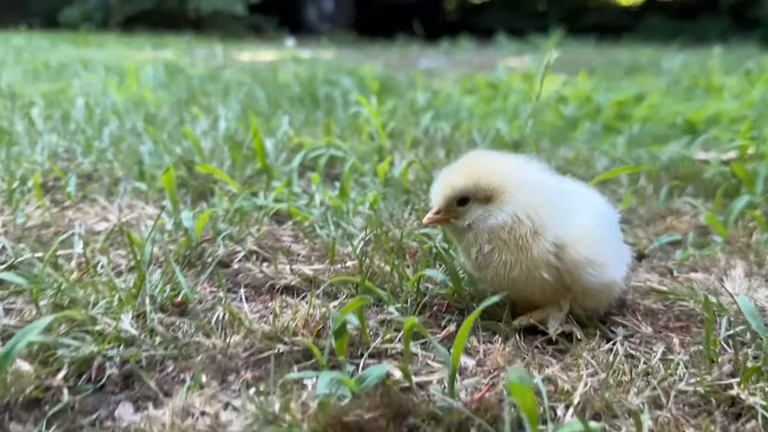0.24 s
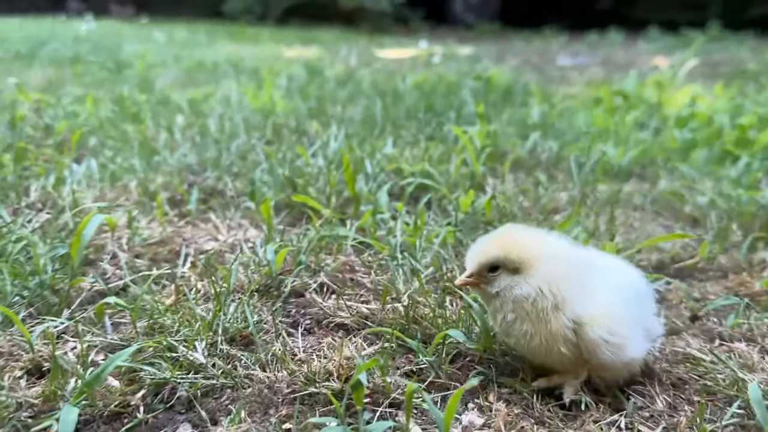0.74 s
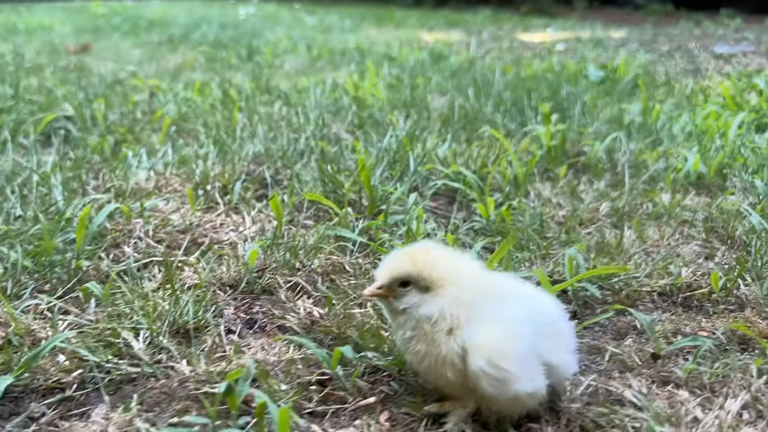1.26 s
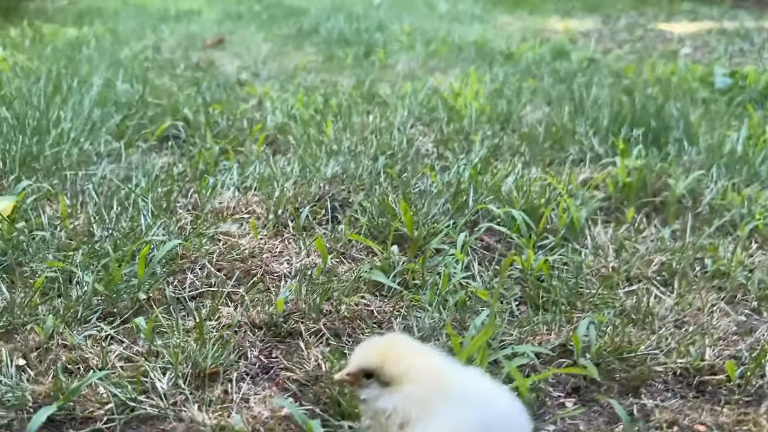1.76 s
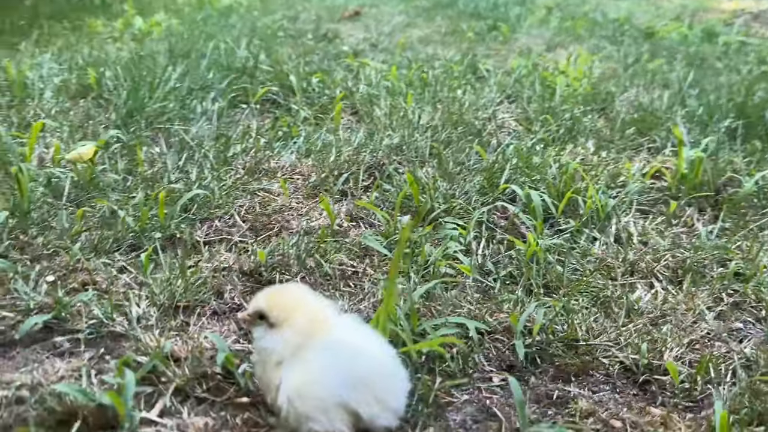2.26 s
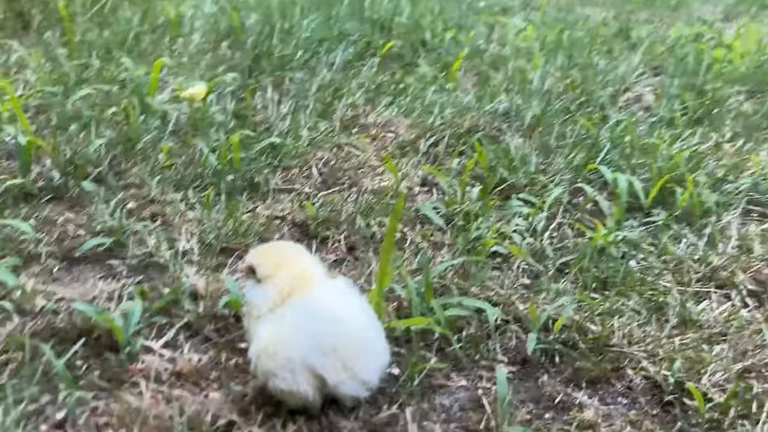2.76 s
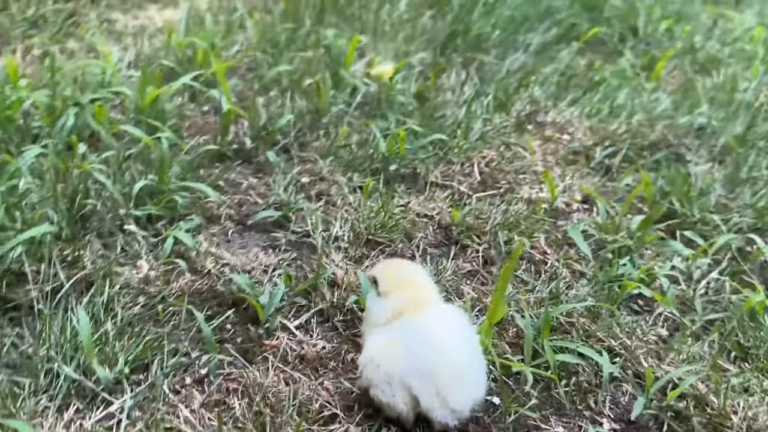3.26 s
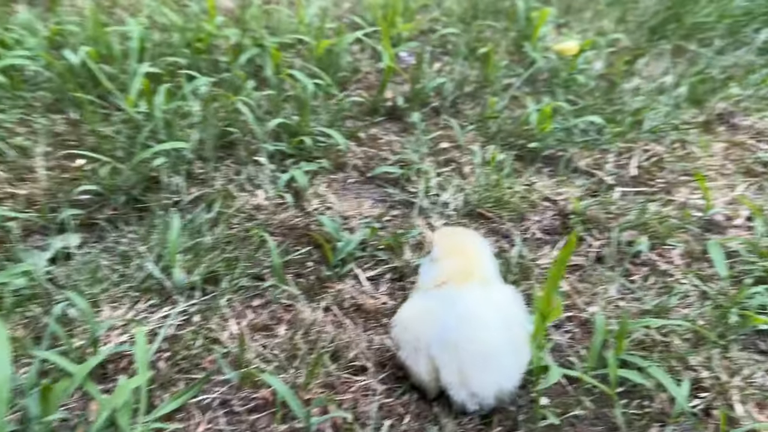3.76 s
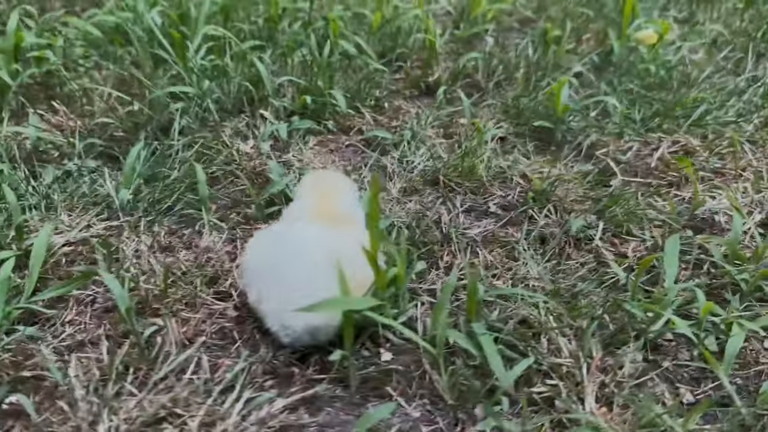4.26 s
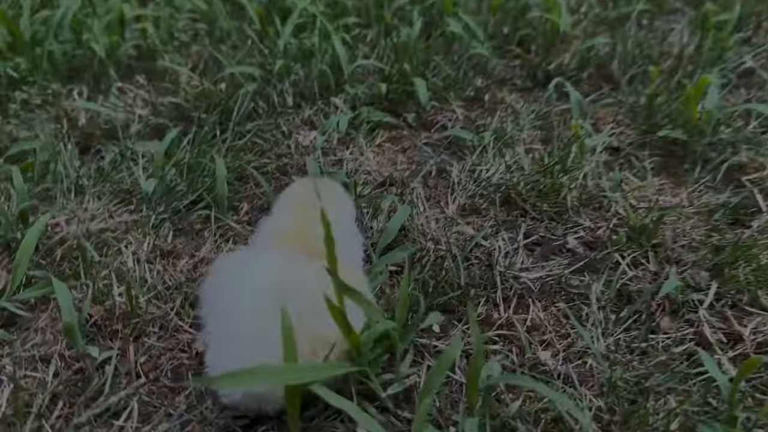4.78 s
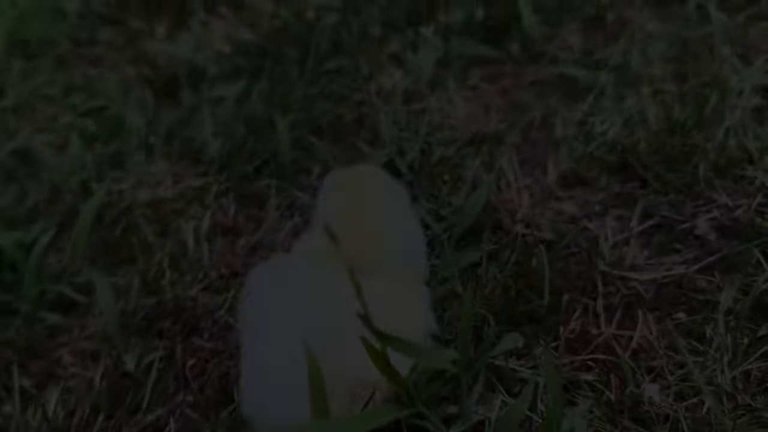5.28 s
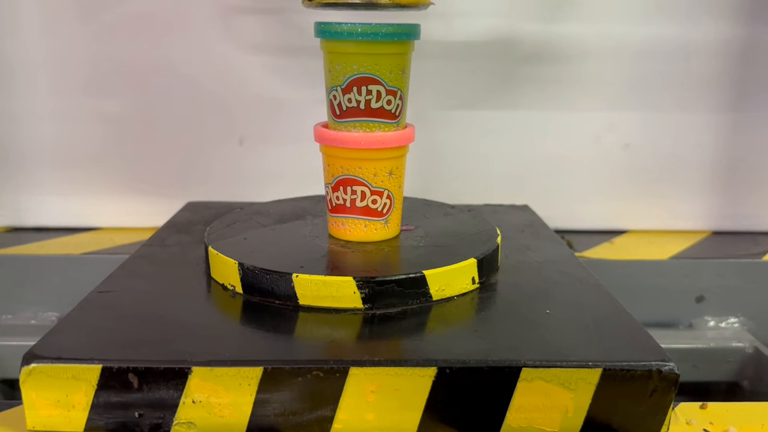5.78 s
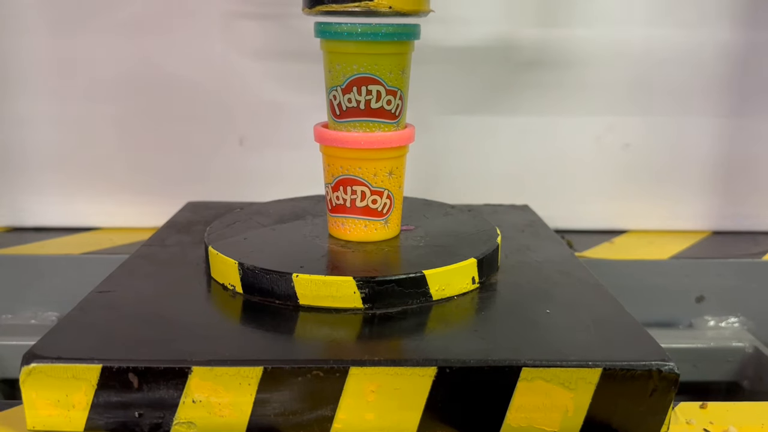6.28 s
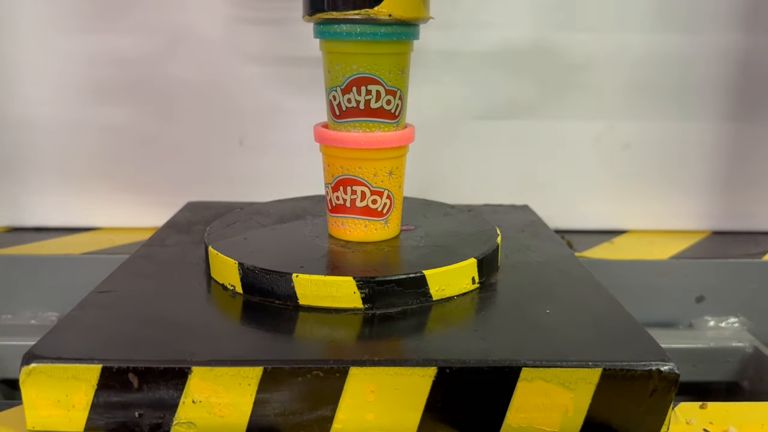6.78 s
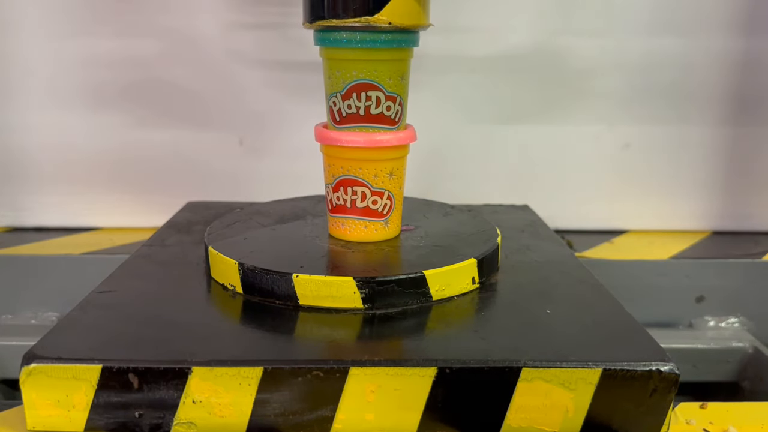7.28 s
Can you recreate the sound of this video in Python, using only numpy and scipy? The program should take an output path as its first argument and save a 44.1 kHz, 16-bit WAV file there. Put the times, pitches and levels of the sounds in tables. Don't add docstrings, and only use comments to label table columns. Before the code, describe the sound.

From 0 to 5.7 s, a quiet lawn: deep distant traffic rumble, airy grass noise and faint falling bird calls scattered behind. A chick gives brief, clear, arching peeps at about 0.3, 0.45, 0.8, 1.0, 1.3, 1.55, 1.9 and 2.2 s, then no more. Around 1.7-2.1 s close scuffs and dull knocks stir the grass; between 2.4 and 3.3 s rustling thickens with brittle stalk snaps and swishes. Small distant whistles appear near 3.5 and 4.2 s. More knocks and sharp crackles come around 4.8-5.3 s, with soft low thumps near 5.6 s. At 5.7 s it cuts abruptly to a far louder hydraulic press: a buzzing pump hum around 245 Hz, rapid metallic chatter, whining overtones, oil hiss and high whistle. It builds within half a second, rises very slightly in pitch, shifts subtly in timbre near 7 s and runs through 7.5 s.

```python
import sys
import numpy as np
from scipy import signal
from scipy.io import wavfile

SR = 44100
rng = np.random.default_rng(int(sys.argv[2]) if len(sys.argv) > 2 else 0)


def elevation(decibels):
    levels = np.asarray(decibels, float)
    return 10 ** (levels / 20)


def bounce(signal):
    frames = np.transpose(np.atleast_2d(signal))
    limited = np.clip(frames, -1, 1)
    pcm = np.round(limited * 32767).astype(np.int16)
    wavfile.write(sys.argv[1], SR, pcm)


N = 332514
TIME = np.arange(N) / SR
CUT_S = 5.7128
SINCE_CUT = np.maximum(TIME - CUT_S, 0)


def rms_one(x):
    return x / np.sqrt(np.mean(x ** 2) + 1e-20)


def in_time(rows):
    return np.interp(TIME, *np.transpose(rows))


def at_hz(points, hz):
    f, value = np.transpose(points)
    return np.interp(np.log(hz), np.log(f), value)


def pan(x, db):
    return np.array([x * elevation(db / 2), x * elevation(-db / 2)])


def add(out, s, sound):
    i = round(s * SR)
    out[:, i:i + sound.shape[-1]] += sound


def drift(rate):
    step = 40
    r = np.exp(-2 * np.pi * rate * step / SR)
    slow = signal.lfilter([1], [1, -2 * r, r * r], rng.standard_normal(N // step + 2002))[2000:]
    return np.interp(np.arange(N) / step, np.arange(len(slow)), rms_one(slow))


def ring(clicks, hz, t60):
    r, w = elevation(-60 / (t60 * SR)), 2 * np.pi * hz / SR
    return signal.lfilter([0, np.sin(w)], [1, -2 * r * np.cos(w), r * r], clicks + 1e-18)


def blurred(hz, blur_hz):
    r = np.exp(-np.pi * blur_hz / SR)
    clear = blur_hz < 30
    draw = rng.standard_normal((2, 2, len(hz) + 4096))
    if clear:
        draw = draw[:, [0, 0]]
    wobble = signal.lfilter([1], [1, -2 * r, r * r], draw[0] + 1j * draw[1])[:, 4096:]
    if clear:
        wobble = wobble + 2 * np.abs(wobble).mean()
    carrier = np.exp(2j * np.pi * np.cumsum(hz) / SR)
    return rms_one(np.real(wobble * carrier))


def smeared(notes):
    out = np.zeros((2, N))
    for s, length, start_hz, end_hz, blur_hz, db in notes:
        u = TIME[:round(2 * length * SR)] / length
        swell = np.minimum(u / .1, 1) * np.exp(-(u / .95) ** 3)
        glide_hz = start_hz + (end_hz - start_hz) * np.minimum(u, 1)
        add(out, s, elevation(db) * swell * blurred(glide_hz, blur_hz))
    return out


def banded_noise(spectrum, alike, swell_db, patchy_db, grain):
    out, edges = 0, 20 * 2 ** np.arange(0, 9.9, .5)
    white = rng.standard_normal((2, 2, N)) * grain
    for k, (low, high) in enumerate(zip(edges, edges[1:])):
        band = signal.butter(2, [low, high], "band", fs=SR, output="sos")
        mid, side = signal.sosfilt(band, white[k % 2])
        hz = np.sqrt(low * high)
        same = np.clip(at_hz(alike, hz), -1, 1)
        gain = elevation(at_hz(spectrum, hz) + swell_db(hz) + patchy_db * drift(4.9))
        out = out + gain * (np.sqrt(1 + same) * mid + np.sqrt(1 - same) * side * [[1], [-1]])
    return out


# f/Hz, bandwidth/Hz, first level/dB, level at the scene change/dB
DRONES = [
    (61.7, 13.5, -55.5, -53),
    (121.8, 3.9, -73.5, -56),
    (11860, 140, -84.5, -110),
]


def drones():
    out = 0
    for hz, blur_hz, first_db, last_db in DRONES:
        level_db = first_db + (last_db - first_db) * TIME / CUT_S
        out = out + elevation(level_db) * blurred(np.full(N, hz), blur_hz)[0]
    return out


# f/Hz, density level/dB per Hz
LAWN_COLOUR = [(12, -44), (20, -32), (46, -2.5), (64, -6.5), (96, -6.5), (127, -9), (208, -18), (306, -19),
               (593, -23), (1060, -23.5), (1940, -20.5), (2110, -23), (2490, -27), (4080, -25.5),
               (14500, -39)]
# f/Hz, likeness
LAWN_ALIKE = [(60, 0.82), (180, 0.847), (540, 0.5), (1600, 0.31), (4790, 0.27), (14300, 0.28)]
# t/s, level/dB
STIR = [(0, -6), (.44, -11), (1.0, -7), (1.55, -5.5), (2.3, -4.5), (2.9, 2), (3.6, 1.5), (4.05, -3.5),
        (4.5, -2), (4.9, 1), (5.3, -2.5), (5.5, -3), (5.72, -8.5)]
# f/Hz, share of the swing
STIR_SHARE = [(200, 0.029), (500, 0.28), (1100, 0.96), (6500, 0.87), (12000, 1.94)]
# t/s, length/s, level over the usual rustle/dB, centre f/Hz
RUSTLES = [(0.26, 0.043, -4, 8000), (1.02, 0.027, -6, 10000), (1.177, 0.053, 1, 8100),
           (1.57, 0.05, 4, 7900), (1.708, 0.16, 10, 1190), (1.702, 0.17, 8, 4340), (1.782, 0.17, 10.5, 890),
           (1.801, 0.2, 10, 5200), (2.102, 0.11, 5, 9050), (2.122, 0.058, 4.5, 1360),
           (2.39, 0.4, 0.5, 10000), (2.74, 0.13, 10, 7350), (2.787, 0.12, 7, 1100), (2.92, 0.26, 10.5, 983),
           (3.2, 0.19, 7.5, 910), (3.297, 0.022, 10.5, 8870), (3.54, 0.12, 7.5, 11000),
           (3.656, 0.034, 13, 11000), (3.83, 0.03, 9, 7600), (4.254, 0.081, 13, 11000),
           (4.268, 0.077, 6, 1200), (4.824, 0.036, -3, 1600), (4.925, 0.022, 11, 10000),
           (5.298, 0.024, 7, 280), (1.796, 0.088, 11.5, 298), (4.418, 0.46, 4.5, 12700),
           (2.953, 0.43, 5, 6200), (0.554, 0.25, -5, 1820), (3.893, 0.414, -1.5, 1200)]


def lawn():
    attack_s, release_s, reach_octaves = 0.028, 0.045, 1
    coarse = TIME[::64]
    s, length, db, centre_hz = np.transpose(RUSTLES)[..., None]
    rise = np.clip((coarse - s) / attack_s, 0, 1) ** 2
    decay = np.exp(-2 * np.maximum(coarse - s - length, 0) / release_s)
    rustle_power = elevation(2 * db) * rise * decay
    stir_db = np.interp(coarse, *np.transpose(STIR))

    def swell_db(hz):
        reach = np.exp(-2 * (np.log2(hz / centre_hz[:, 0]) / reach_octaves) ** 2)
        power = elevation(2 * at_hz(STIR_SHARE, hz) * stir_db) + reach @ rustle_power
        return np.interp(TIME, coarse, 10 * np.log10(power))

    grain = elevation(1.25 * drift(67))
    left, right = banded_noise(LAWN_COLOUR, LAWN_ALIKE, swell_db, patchy_db=1.42, grain=grain)
    return elevation(-29.5) * np.array([left, np.roll(right, 10)])


# t/s, f/Hz, level/dB
FAR_BIRDS = [(.0, 4220, -64), (.09, 5280, -63), (0.599, 3920, -55), (1.223, 4000, -55.5), (2.31, 3830, -55),
             (3.441, 3920, -56), (3.678, 4080, -57), (3.964, 4020, -57.5), (4.286, 4030, -60),
             (4.965, 4160, -61.5), (5.145, 4090, -58.5), (5.457, 4160, -62.5)]
# delay/s, length/s, first share of f, last share of f, bandwidth share of f, level/dB
CALL = [
    (.001, .07, 1.13, 1.11, .025, -1),
    (.014, .065, 1.02, .92, .08, -1),
    (.046, .06, .81, .8, .08, -2.5),
    (.062, .09, .89, .84, .09, -4),
]
# t/s, length/s, first f/Hz, last f/Hz, level/dB
WHISTLES = [(.624, .25, 2400, 2450, -68), (.905, .06, 3350, 3200, -65), (3.457, .022, 2650, 3390, -52),
            (3.492, .02, 2920, 3530, -54), (3.552, .095, 2170, 2165, -54.5), (3.9, .15, 1820, 1840, -65),
            (4.125, .05, 1980, 2070, -63), (4.165, .055, 2070, 2190, -58), (4.212, .07, 2200, 2770, -60)]


def far_birds():
    notes = []
    for s, hz, db in FAR_BIRDS:
        for delay, length, first, last, blur, note_db in CALL:
            level_db = db + note_db + rng.normal(0, 1.5)
            notes.append((s + delay, length, first * hz, last * hz, blur * hz, level_db))
    for s, length, start_hz, end_hz, db in WHISTLES:
        blur_hz = 5 * 2 ** ((-50 - db) / 3.5)
        notes.append((s, length, start_hz, end_hz, blur_hz, db))
    echoes = [(s + 0.026, 1.5 * length, start_hz, .96 * end_hz, 4.1 * blur_hz, db - 13.0)
              for s, length, start_hz, end_hz, blur_hz, db in notes]
    return smeared(notes) + smeared(echoes)


# t/s, peak level/dB, f/Hz
THUMPS = [(1.339, -43, 70.6), (3.337, -37, 84), (5.614, -35, 84), (5.681, -41, 90)]


def thumps():
    out = np.zeros((2, N))
    t = TIME[:4096]
    for s, db, hz in THUMPS:
        cycles_done = np.minimum(t * hz / 2.26, 1)
        add(out, s, elevation(db) * np.sin(2 * np.pi * hz * t) * np.sin(np.pi * cycles_done) ** 2)
    return out


# t/s, peak level/dB, f/Hz
KNOCKS = [(1.708, -45, 1640), (1.785, -43, 1090), (1.808, -31, 1850), (1.848, -37.5, 1110), (2, -37, 1660),
          (2.942, -45.5, 1190), (2.968, -37.5, 1190), (3.247, -41.5, 217), (3.405, -42.5, 1420),
          (3.601, -46, 1350), (3.872, -45, 1190), (4.525, -48.5, 1050), (4.83, -40.5, 1060),
          (4.838, -44, 1540), (4.853, -42.5, 1400), (4.865, -46, 990), (4.96, -45, 1130),
          (5.326, -44.5, 263)]


def knocks():
    out, click = np.zeros((2, N)), np.arange(2048) == 0
    for s, db, hz in KNOCKS:
        rub = rng.standard_normal((2, 2048)) * elevation(-60 * TIME[:2048] / 0.015)
        body = ring(click + 0.38 * rub, hz, 16 / hz)
        upper = 0.59 * ring(rub, 1.38 * hz, 2.8 / hz)
        add(out, s, elevation(db - 6.0) * (body + upper))
    return out


# t/s, length/s, first f/Hz, last f/Hz, level/dB
SWISHES = [(1.718, 0.058, 1700, 1815, -48.5), (1.795, 0.13, 1856, 1700, -48),
           (2.006, 0.052, 1720, 1540, -52.5), (2.76, 0.17, 5200, 4970, -50),
           (2.759, 0.15, 7430, 7250, -48.5), (2.933, 0.083, 1222, 896, -58),
           (3.038, 0.051, 1187, 1184, -48), (3.133, 0.045, 1233, 664, -44)]


def swishes():
    return smeared([(s, length, start_hz, end_hz, 0.22 * start_hz, db)
                    for s, length, start_hz, end_hz, db in SWISHES])


# t/s, peak level/dB, f/Hz, left-right level/dB
SNAPS = [(1.724, -58, 5000, -1), (2.4438, -50, 7600, 14), (2.487, -48, 6900, 20), (2.5713, -47, 6610, 4.5),
         (2.717, -45, 4370, 2.5), (2.745, -43, 4730, 1.5), (2.7604, -38, 5140, 3.0),
         (2.781, -41, 6500, 4.0), (2.795, -48, 5200, 4.0), (2.853, -35, 6500, 6), (2.889, -39, 5000, 4.0),
         (2.8145, -34, 6000, 5.5), (4.6798, -45, 11400, 1.0), (4.8816, -43.5, 6550, 20),
         (4.9445, -37, 6500, 1), (4.9504, -39, 5700, 10.0), (4.9604, -26, 6130, 16), (5.0835, -45, 8000, 9),
         (5.1158, -47, 12600, 17), (5.1665, -41.5, 5530, 15), (5.1886, -46, 6220, 14),
         (5.2551, -43, 7500, -7), (5.2844, -46, 7660, -4), (5.306, -42, 7100, 17), (5.6396, -53, 6150, 3.5)]


def snaps():
    out = np.zeros((2, N))
    for s, db, hz, pan_db in SNAPS:
        crack = rng.standard_normal(2048) * elevation(-60 * TIME[:2048] / 0.013)
        stalk = 0.39 * ring(crack, hz, 0.0067) + 0.5 * ring(crack, 1.23 * hz, 0.0012)
        add(out, s, pan(elevation(db - 10.5) * stalk, pan_db))
    return out


# t/s, length/s, top f/Hz, last f/Hz, peak level/dB
PEEPS = [(0.274, .055, 2900, 2020, -47.5), (0.277, 0.051, 3590, 2900, -53.5),
         (0.445, 0.033, 2826, 2330, -54), (0.446, 0.0247, 3100, 2900, -61), (.821, 0.067, 3100, 2090, -49),
         (.822, 0.079, 3680, 2960, -57), (.28, .045, 4300, 3800, -72), (0.284, 0.032, 2200, 1900, -68),
         (.83, 0.064, 4250, 3770, -65), (.83, .045, 2500, 2170, -63), (1.022, 0.054, 3470, 2580, -45),
         (1.313, 0.073, 3570, 2360, -41), (1.558, 0.073, 3520, 2580, -43.5),
         (1.915, 0.082, 3690, 2260, -43), (2.189, 0.084, 3650, 2290, -48.5)]
# t/s, left-right level/dB
CHICK_PAN = [(.3, 7), (.46, 7), (.85, -5), (1.05, -7), (1.35, 7), (1.6, 7), (1.95, 10), (2.23, 17)]
OVERTONES_DB = [-21, -30, -33]


def chick():
    out = np.zeros((2, N))
    for s, length, top_hz, end_hz, db in PEEPS:
        start_hz = top_hz - .55 * (top_hz - end_hz)
        u = np.arange(round(length * SR)) / (length * SR)
        rise, fall = (top_hz - start_hz) ** 0.52, (top_hz - end_hz) ** 0.54
        top = rise / (rise + fall)
        climbing_hz = top_hz - (top_hz - start_hz) * np.abs(1 - u / top) ** 3.1
        falling_hz = top_hz - (top_hz - end_hz) * np.abs((u - top) / (1 - top)) ** 2.2
        phase = 2 * np.pi * np.cumsum(np.where(u < top, climbing_hz, falling_hz)) / SR
        voice = np.sin(phase)
        for k, overtone_db in enumerate(OVERTONES_DB, 2):
            voice = voice + elevation(overtone_db) * np.sin(k * phase)
        effort = np.sin(np.pi * u ** 1.11) ** 0.53
        add(out, s, pan(elevation(db) * effort * voice, np.interp(s, *np.transpose(CHICK_PAN))))
    return out


# f/Hz, density level/dB per Hz
OIL = [(20, -34), (90, -31), (150, -23.5), (250, -20.5), (400, -22.5), (650, -24), (1100, -24.5),
       (1440, -25.5), (1620, -14.5), (2400, -19), (4000, -25.5), (6000, -23), (10000, -25.5), (13000, -25),
       (15000, -33)]
# f/Hz, likeness
OIL_ALIKE = [(60, 0.48), (150, 0.46), (600, 0.32), (2000, 0.29), (6000, 0.23), (14000, 0.12)]


def oil_hiss(ports):
    hiss = banded_noise(OIL, OIL_ALIKE, lambda hz: 0, patchy_db=0.8, grain=elevation(1.43 * ports))
    return elevation(-30) * rms_one(hiss)


# f/Hz, bandwidth/Hz, level/dB, throb per turn/dB
PORT_WHISTLES = [
    (9944, 240, -39.5, 3),
    (8240, 240, -48, 1),
    (6900, 1260, -46.5, 4),
]


def port_whistles(ports):
    out = 0
    for hz, width_hz, db, throb_db in PORT_WHISTLES:
        out = out + elevation(db + throb_db * ports + drift(6.8)) * blurred(np.full(N, hz), width_hz)
    return 0.03 * out[0] + 1.02 * out


def passes(turns, at):
    return np.diff(np.floor(turns - at), prepend=0) > 0


def knocked(turns, at, modes, jitter_db, rattle):
    blows = passes(turns, at)
    out = 0
    for hz, db, t60, pan_db, swing in modes:
        loose = rng.standard_normal(N) + .5 * rng.standard_normal((2, N))
        push = blows * elevation(jitter_db * drift(4.3)) + rattle * loose
        cushioned = ring(push, hz, .009)
        out = out + swing * elevation(db) * pan(np.ones(N), pan_db) * ring(cushioned, hz, t60)
    return rms_one(out)


# f/Hz, level/dB, t60/s, left-right level/dB, first swing in or out
VALVE = [
    (5834, 5, 0.0096, -4, 0.96),
    (5280, -7, 0.0049, -1.5, -0.92),
    (6130, -6, 0.032, 0, -0.93),
]


def valve_ring(turns, pressure, flow):
    level_db = -49 + 10.5 * pressure - 3 * flow
    return elevation(level_db) * knocked(turns, .98, VALVE, jitter_db=1.5, rattle=.012)


CLACK_TURN = .164
# f/Hz, level/dB, t60/s, left-right level/dB, first swing in or out
CASING = [
    (1340, -17, .05, -1.5, 1),
    (2500, -12, .07, 3.0, 1),
    (2670, -9, .04, 3.0, 1),
    (2990, -11, .03, 1.5, 1),
]


def casing_knock(turns, pressure, flow):
    level_db = -52.5 + 5.5 * pressure + 4.2 * flow
    metal = elevation(level_db) * knocked(turns, .1, CASING, jitter_db=1.1, rattle=.003)
    seated = passes(turns, CLACK_TURN) * elevation(-30 + 1.5 * drift(12))
    clack_hz = 2200
    clack = np.gradient(ring(seated, clack_hz, .003)) * SR / (2 * np.pi * clack_hz)
    return metal + pan(clack, 2.2)


# multiple of the shaft speed, level/dB
ORDERS_DB = [(1, -47), (2, -47), (3, -34), (4, -23), (5, -25), (6, 0), (7, -18), (8, -18), (9, -23),
             (10, -20), (11, -13), (12, -33), (13, -27), (14, -27), (15, -39), (16, -28), (17, -27),
             (18, -30), (19, -34), (20, -23), (21, -29), (22, -29), (23, -26), (24, -31), (25, -34),
             (26, -32), (27, -38), (28, -35), (29, -35), (30, -27)]
# multiple, level at rest/dB, gain with flow/dB, gain while cold/dB
SINGING = [(8, -17.5, -1, -4), (10, -20, 0, -3), (11, -13, -2, 4), (13, -23, -8, -2), (14, -25, -5, -2),
           (16, -26, -7, -6), (20, -26, 5, 5), (23, -23, -13, -6), (30, -31, 7, -8), (33, -29, -2, -2),
           (36, -31, -2, -8), (37, -35, 0, 13), (38, -22, 2, -12), (39, -17.5, -1, 8), (40, -18, -22, 7),
           (41, -36, 11, 0), (42, -28, 15, 3), (43, -17, -22, 9), (44, -27, 4, 1), (45, -30, 3, 12),
           (46, -29, -3, 7), (47, -24, 12, -8), (48, -21, -4, 12), (50, -29, 9, 0), (51, -35, 2, 17),
           (52, -30, 0, -12), (53, -27, -3, -2), (54, -24, 1, -5), (55, -27, 7, 4), (56, -22, 0, 5),
           (57, -24, 1, 2), (58, -33, 4, 3), (59, -26, -3, 2)]
RINGS_LATE = (39, 40, 41)


def shaft_orders(strokes, turns, pressure, flow):
    pistons = 6
    cold = np.exp(-(SINCE_CUT / .3) ** 2)
    linger = np.exp(-(SINCE_CUT / .52) ** 2)
    hum = 0
    steady = [(order, db, 0, 0) for order, db in ORDERS_DB[2:] if order not in np.transpose(SINGING)[0]]
    for order, db, flow_db, cold_db in steady + SINGING:
        late, whine = order in RINGS_LATE, order > 36
        lag, scatter = rng.random(2)
        if order > 10:
            start = .2 - order * CLACK_TURN + (.25 if whine else .5) * (scatter - .5)
        else:
            start = (pistons - order) * -.08
        start -= .25 * late
        lags = np.array([[0], [.008 * order * (lag - .5)]])
        angle = order * (strokes if order == pistons else turns) + start + lags
        unsteady_db = (.08 * min(order, 12) * drift(1.2) - .5) * (order != pistons)
        level_db = db + unsteady_db + flow_db * flow + cold_db * (linger if late else cold) + 1.03 * whine
        tone = elevation(level_db) * np.cos(2 * np.pi * angle)
        hum = hum + tone * elevation((.75 + whine) * np.array([[1], [-1]]))
    return np.sqrt(2) * elevation(-25 + 3.31 * pressure - 0.36 * flow) * hum


# t/s, f/Hz
SHAFT = [(5.71, 40.5), (6.0, 40.62), (6.4, 40.88), (6.75, 40.95), (7.54, 40.95)]
# t/s, flow 0-1
FLOW = [(5.71, 0.06), (5.86, 0.06), (6.0, 0.83), (6.25, 0.88), (6.7, 0.93), (6.95, 0.71), (7.2, 0.07),
        (7.4, 0), (7.54, .0)]


def press():
    pressure = 1 - np.exp(-SINCE_CUT / 0.21)
    flow = in_time(FLOW)
    strokes = np.cumsum(in_time(SHAFT)) / SR
    strokes = strokes - strokes[round(5.7988 * SR)]
    turns = strokes - .022 * np.exp(-SINCE_CUT / .4)
    ports = np.cos(2 * np.pi * (turns - .78))
    left, right = oil_hiss(ports) + port_whistles(ports) + valve_ring(turns, pressure, flow)
    airborne = np.array([np.roll(left, 2), right])
    return shaft_orders(strokes, turns, pressure, flow) + casing_knock(turns, pressure, flow) + airborne


def lead_hiss():
    swell = np.clip((TIME - CUT_S) / 0.021 + 1, 0, 1) ** 0.49
    return elevation(-38.5) * swell * rng.standard_normal((2, N))


def scene():
    cut = np.clip((TIME - CUT_S) / 0.0012, 0, 1)
    outdoors = drones() + lawn() + far_birds() + thumps() + knocks() + swishes() + snaps() + chick()
    return (1 - cut) * (outdoors + lead_hiss()) + cut * press()


def roll_off(x):
    return signal.sosfilt(signal.butter(12, 14650, fs=SR, output="sos"), x)


def record(dry):
    top = signal.cheby2(12, 70, 15300, fs=SR, output="sos")
    mix = signal.sosfilt(top, dry)
    return roll_off(mix)


dry = scene()
out = record(dry)
bounce(out)
```